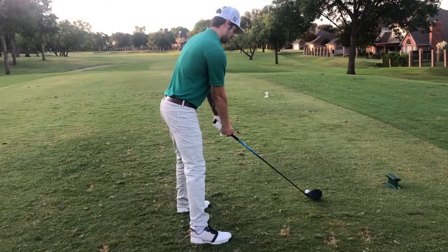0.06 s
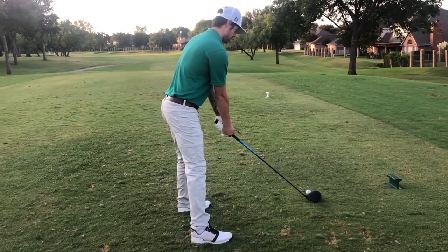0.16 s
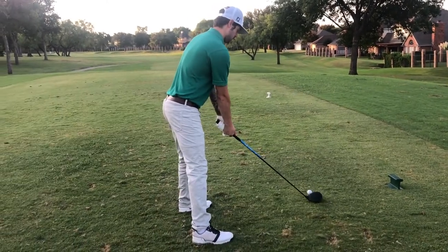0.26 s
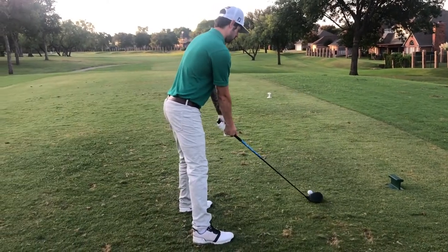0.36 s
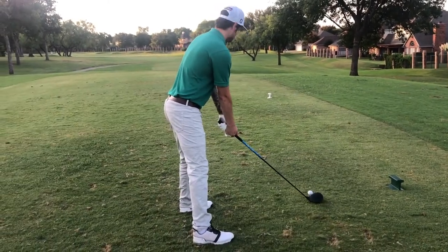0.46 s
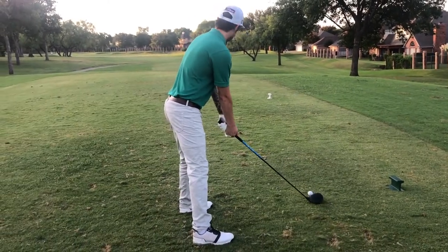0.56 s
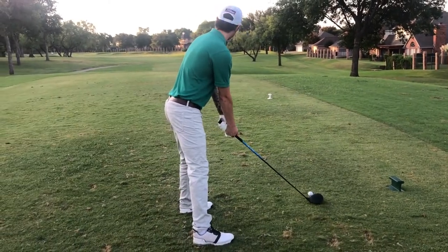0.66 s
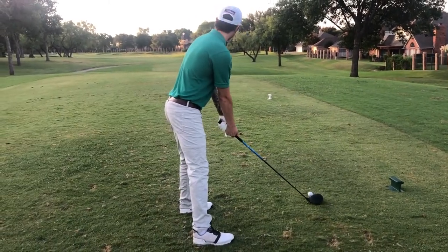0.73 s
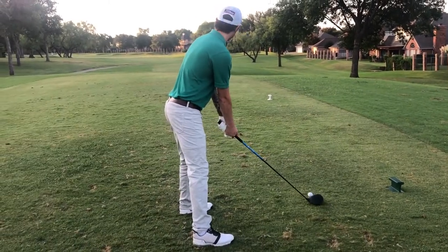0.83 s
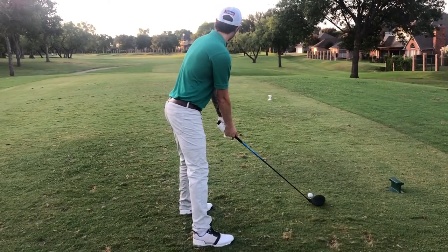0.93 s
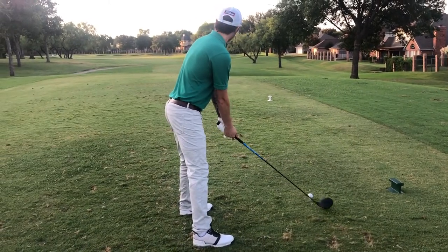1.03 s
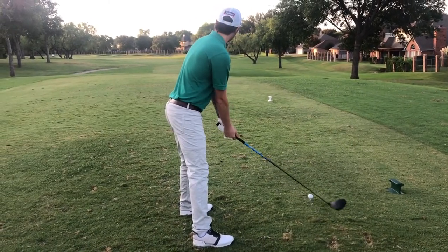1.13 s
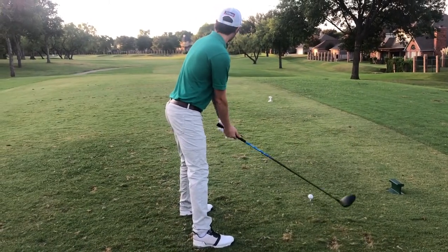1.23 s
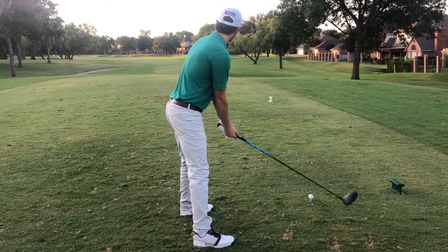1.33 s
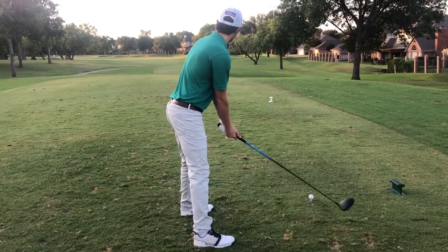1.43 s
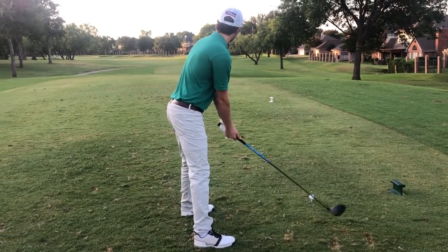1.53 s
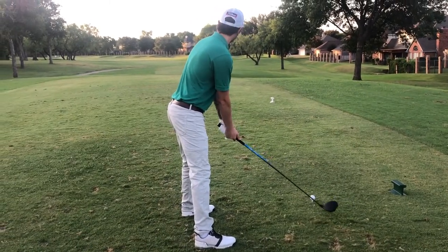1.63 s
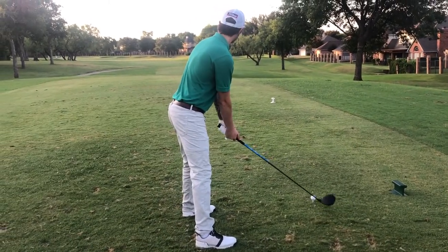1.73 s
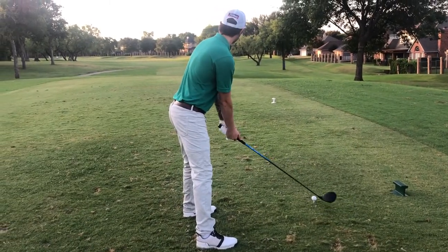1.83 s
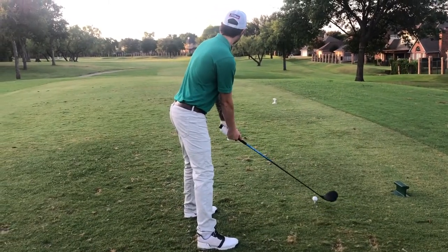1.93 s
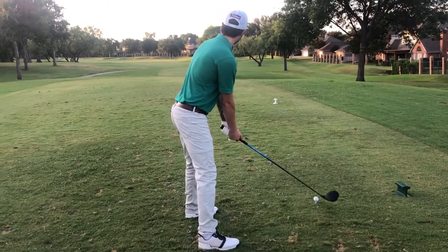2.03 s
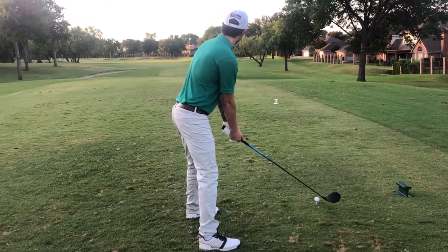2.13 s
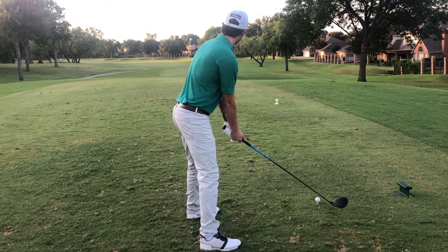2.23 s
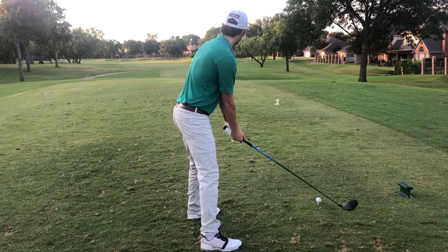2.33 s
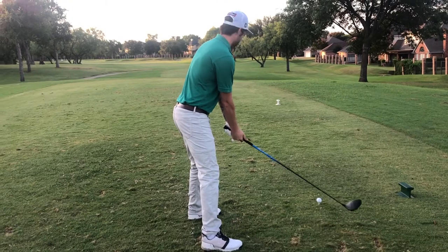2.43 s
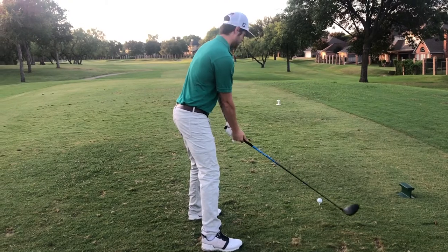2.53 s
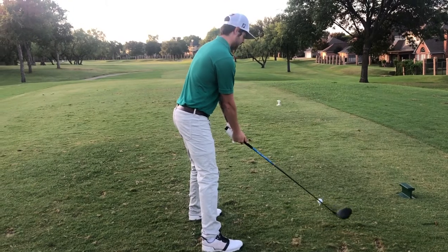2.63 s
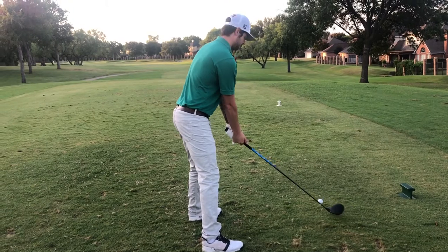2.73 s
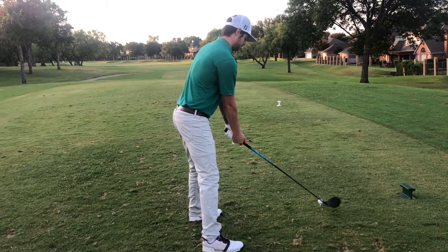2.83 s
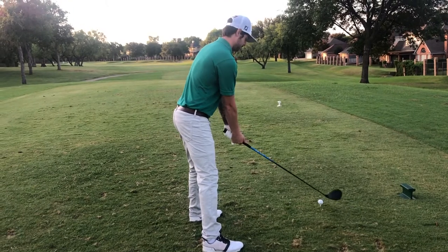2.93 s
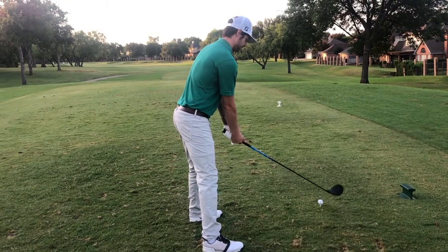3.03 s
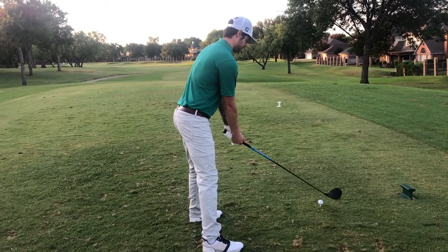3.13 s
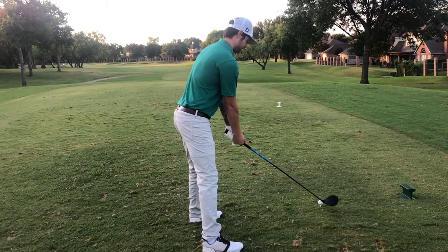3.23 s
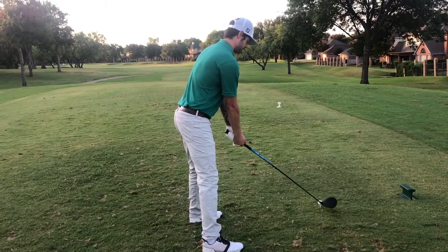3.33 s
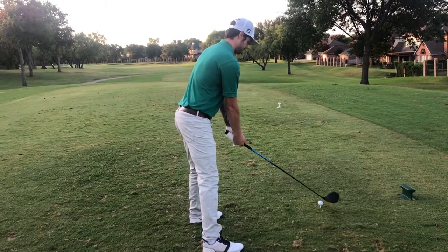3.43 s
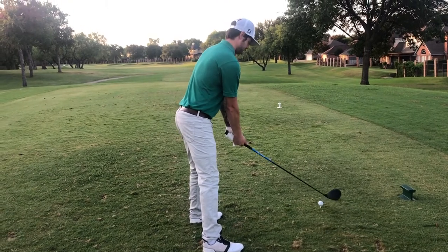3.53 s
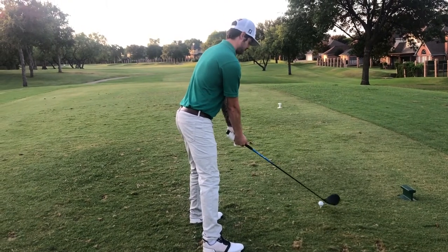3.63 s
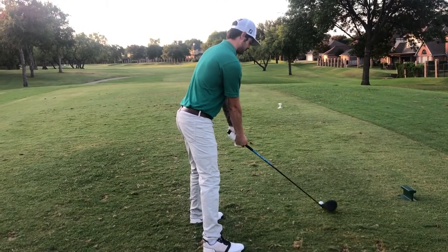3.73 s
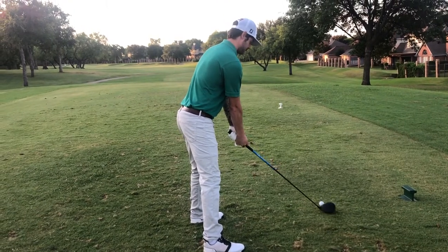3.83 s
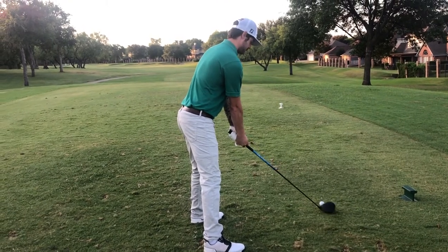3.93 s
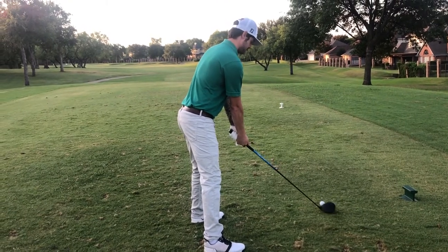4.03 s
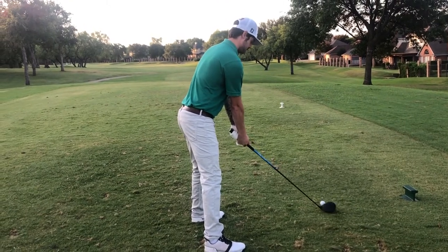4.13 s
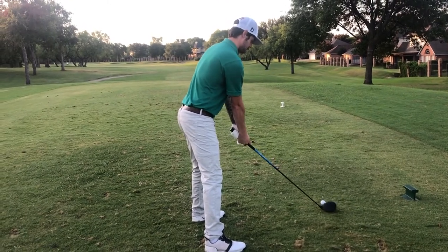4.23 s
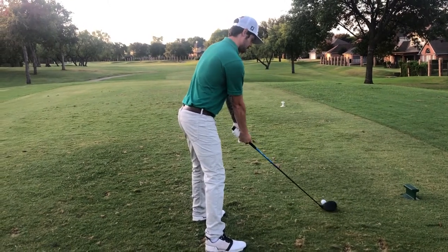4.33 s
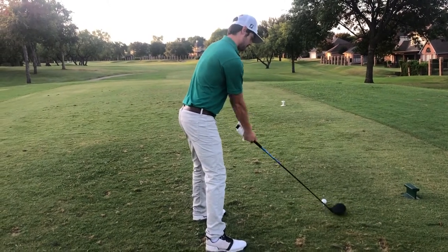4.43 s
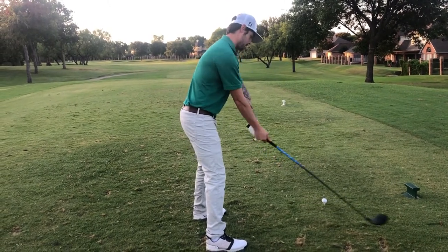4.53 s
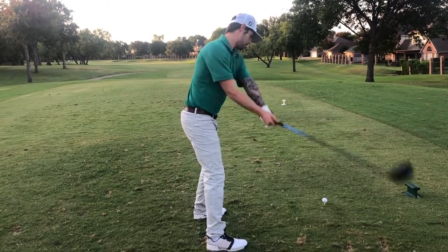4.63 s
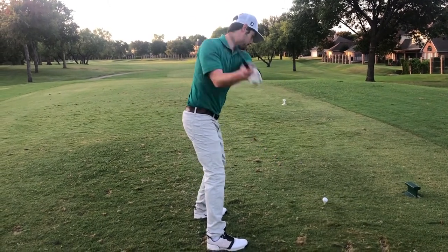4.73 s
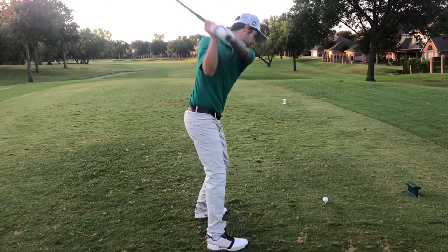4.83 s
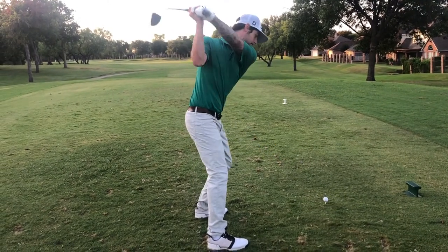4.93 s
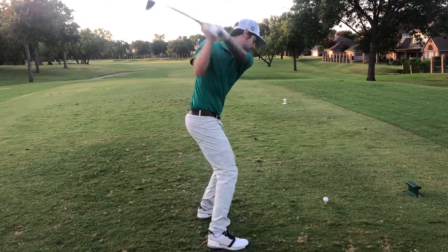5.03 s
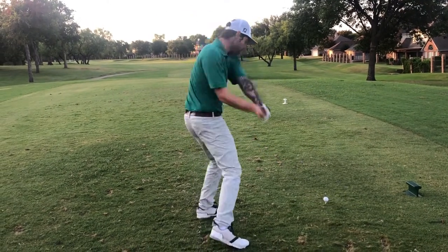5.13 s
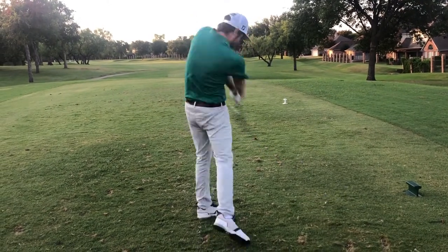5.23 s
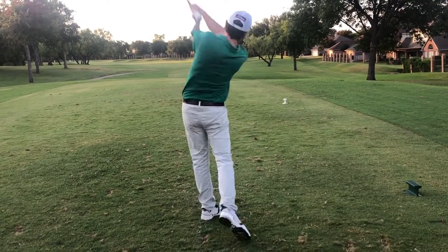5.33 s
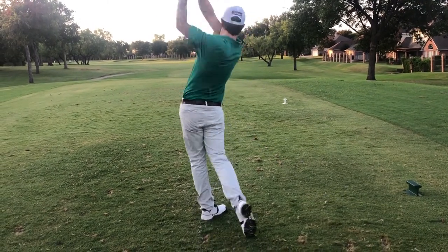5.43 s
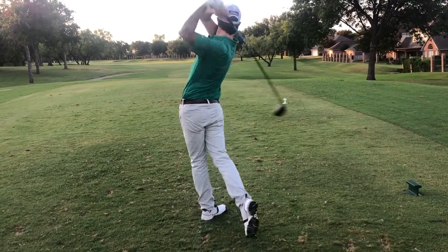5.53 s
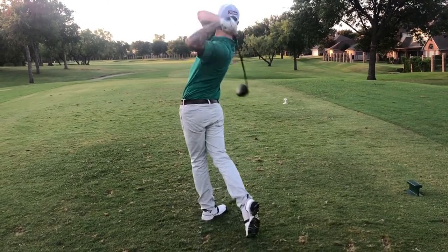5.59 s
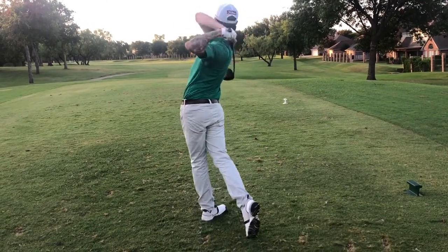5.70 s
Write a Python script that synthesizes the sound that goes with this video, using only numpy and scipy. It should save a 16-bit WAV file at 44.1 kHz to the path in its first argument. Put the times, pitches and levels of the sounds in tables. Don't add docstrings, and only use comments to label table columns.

```python
import sys
import numpy as np
from scipy import signal
from scipy.fft import rfft, irfft, next_fast_len
from scipy.io import wavfile
from scipy.ndimage import uniform_filter1d

SR = 44100
rng = np.random.default_rng(int(sys.argv[2]) if len(sys.argv) > 2 else 0)


def digitize_waveform(pressure):
    field = np.atleast_2d(pressure).T
    bounded = np.clip(field, -1, 1)
    quanta = np.round(bounded * 32767).astype(np.int16)
    wavfile.write(sys.argv[1], SR, quanta)


def elevation(decibels):
    levels = np.asarray(decibels, float)
    return 10 ** (levels / 20)


N = 253999
TIME = np.arange(N) / SR


def rms_one(x):
    return x / np.sqrt(np.mean(x ** 2) + 1e-20)


def in_time(rows):
    seconds, *columns = np.transpose(rows)
    return [np.interp(TIME, seconds, column) for column in columns]


def coloured(x, points):
    size = next_fast_len(N)
    hz, db = np.transpose(points)
    axis_hz = np.maximum(np.arange(size // 2 + 1) * SR / size, 1)
    gain = elevation(np.interp(np.log(axis_hz), np.log(hz), db))
    return irfft(rfft(x, size) * gain, size)[:N]


def filtered(x, order, hz, kind):
    return signal.sosfilt(signal.butter(order, hz, kind, fs=SR, output="sos"), x)


def filtered_in_step(x, hz, kind):
    return signal.sosfiltfilt(signal.butter(2, hz, kind, fs=SR, output="sos"), x)


def drift(rate, size=N):
    knots = np.arange(-1, size / SR * rate + 2) / rate
    wander = np.interp(TIME[:size], knots, rng.standard_normal(len(knots)))
    return rms_one(uniform_filter1d(wander, int(SR / rate / 2)))


def tone(hz):
    return np.sqrt(2) * np.sin(2 * np.pi * np.cumsum(hz + 0 * TIME) / SR)


def struck(modes, since, clock):
    return sum(elevation(db - 60 * since / t60) * np.sin(2 * np.pi * hz * clock) for hz, db, t60 in modes)


def glides(rows, arch, wobble_hz=np.zeros(N)):
    out = np.zeros(N)
    for s, length, first_hz, last_hz, db in rows:
        start = round(s * SR)
        along = np.linspace(0, 1, round(length * SR))
        hz = first_hz + (last_hz - first_hz) * along + wobble_hz[start:start + len(along)]
        swell = np.abs(np.sin(np.pi * along)) ** arch
        out[start:start + len(along)] += elevation(db + 3) * swell * np.sin(2 * np.pi * np.cumsum(hz) / SR)
    return out


# pitch in Hz, level in dB per Hz.
AIR_COLOUR = [(18, -60), (27, -44), (41, -11.5), (74, -2.5), (131, -4), (159, -10.5), (214, -12.5),
              (342, -18), (426, -22.5), (1020, -28.5), (2200, -39), (4630, -45), (9000, -49.5),
              (15500, -55.5)]
# time in seconds, level in dB.
HUM_LEVEL = [(0.0, -47), (0.06, -40.5), (0.4, -49.5), (1.09, -43.5), (1.91, -53), (2.18, -64),
             (2.45, -47.5), (3.05, -54), (3.72, -46), (5.49, -50), (5.65, -45), (5.76, -53)]
# pitch in Hz, wander of the pitch in Hz, level in dB.
MACHINE_DRONES = [(90.6, 8.2, -50.5)]


def air():
    car_s, car_width_s, car_db = 2.52, 0.93, 4
    rise_db = car_db * np.exp(-((TIME - car_s) / car_width_s) ** 2)
    bed = rms_one(coloured(rng.standard_normal(N), AIR_COLOUR))
    low = filtered_in_step(bed, 180, "low")
    traffic = filtered_in_step(bed, [180, 420], "band")
    rest = bed - low - traffic
    out = elevation(-41.5 + 0.47 * drift(2.42)) * low
    out += elevation(-41.0 + rise_db) * traffic
    out += elevation(-42 + 0.48 * drift(3.034)) * rest
    hum_db, = in_time(HUM_LEVEL)
    out += elevation(hum_db - 1.0) * tone(130.6 + 1.52 * drift(3.0))
    for hz, width_hz, db in MACHINE_DRONES:
        out += elevation(db + 1.1 * drift(3.42)) * tone(hz + width_hz * drift(1.5))
    return out


# time in seconds, level in dB, top pitch in Hz.
KATYDID_BUZZ = [
    (0, -79, 9520),
    (1.84, -72.5, 9520),
    (3.08, -69, 9760),
    (5.76, -69, 9740),
]


def katydid():
    db, top_hz = in_time(KATYDID_BUZZ)
    strokes = np.cumsum(63.3 + 0.16 * drift(3.16)) / SR
    arch = np.sin(np.pi * (strokes % 1))
    pitch_hz = top_hz - 1100 * (1 - arch) + 25 * drift(80)
    return elevation(db - 1.5 + 1.6 * drift(18)) * arch ** 0.64 * tone(pitch_hz)


# start in seconds, length in seconds.
CRICKET_TRILLS = [(0.038, 0.3), (0.484, 0.59), (1.217, 0.57), (1.921, .478), (2.565, 0.15), (2.877, 0.55),
                  (3.547, .565), (4.243, .405), (4.797, .414)]


def cricket():
    trill_db, strokes_per_s, fade_db_per_s = -61.5, 88.5, 500
    level, strokes = np.zeros(N), np.zeros(N)
    pace = 3.0 * drift(25) + 2.2 * drift(3.0)
    for s, length in CRICKET_TRILLS:
        over = np.maximum(TIME - s - length, 0)
        on = (TIME >= s) & (over < .05)
        level += on * elevation(trill_db - fade_db_per_s * over)
        strokes += on * np.cumsum((strokes_per_s + pace) * on) / SR
    closing = np.minimum(strokes % 1 / .68, 1)
    stroke_number = np.cumsum(np.diff(strokes // 1, prepend=0) != 0)
    force_db = 4.4 - 2.8 * np.minimum(rng.exponential(1, 600), 4.0)[stroke_number]
    pitch_hz = 5390 - 300 * closing ** 3.0 + 30 * drift(90)
    song = level * elevation(force_db) * np.sin(np.pi * closing) ** 0.44 * tone(pitch_hz)
    neighbours = elevation(-75.5) * drift(150) * tone(5330)
    return song + neighbours


# time in seconds, level in dB, length
# in seconds, lowest and highest Hz.
SOFT_SWELLS = [
    (0.288, -64, 0.048, 500, 5000),
    (1.319, -75, .06, 6300, 6800),
    (3.0, -72, 0.031175, 3790, 4160),
    (4.088, -51, 0.00098, 500, 2500),
    (4.315, -72, 0.017, 6020, 9100),
    (4.516, -64, .03, 2990, 9900),
    (4.803, -70, 0.11296, 2800, 4488),
    (5.1, -54.5, 0.028, 700, 1490),
    (5.626, -47.5, 0.015, 1100, 1510),
]


def rustles():
    out, since = np.zeros(N), TIME[:SR // 4]
    for s, db, length, low_hz, high_hz in SOFT_SWELLS:
        hiss = rms_one(filtered(rng.standard_normal(SR // 4), 2, [low_hz, high_hz], "band"))
        swell = np.exp(-((since - 1 / 8) / length) ** 2)
        out[round(s * SR) - SR // 8:][:SR // 4] += elevation(db) * swell * hiss
    return out


# time in seconds, peak level in dB, pitch in Hz.
FAR_KNOCKS = [
    (1.809, -34, 563),
    (1.854, -36, 627),
    (1.8865, -40, 652),
    (1.925, -39, 594),
]


def knocks():
    out, since = np.zeros(N), TIME[:SR // 4]
    for s, db, hz in FAR_KNOCKS:
        ringing = struck([(hz, -1.5, .04), (1.4434 * hz, -5, .025)], since, since)
        out[round(s * SR):][:SR // 4] += elevation(db + 2.0) * np.minimum(since / .002, 1) * ringing
    return out


# start in seconds, length in seconds, first Hz, last Hz, level in dB.
HIGH_BIRD_NOTES = [(2.085, 0.075, 2846, 3000, -59.5), (2.14, 0.058, 2900, 2780, -55),
                   (2.185, 0.045, 2790, 2950, -55), (2.705, 0.07, 2740, 2840, -64),
                   (2.785, 0.1, 2780, 2840, -55.5), (2.88, .035, 2710, 2670, -67),
                   (3.845, 0.052, 2880, 2750, -56.5), (3.89, 0.055, 2730, 2890, -58),
                   (3.935, 0.058, 2765, 2790, -61), (3.98, 0.042, 2860, 2770, -60),
                   (4.68, 0.095, 2670, 2890, -64), (4.775, 0.0804, 2740, 2936, -58)]
LOW_BIRD_NOTES = [(2.09, 0.11, 2250, 2190, -69), (2.17, 0.11, 2140, 2060, -62),
                  (2.41, 0.06, 2110, 2060, -66), (2.68, .09, 2200, 2200, -69),
                  (2.82, 0.14, 2160, 2060, -62.5), (3.07, 0.043, 2080, 2050, -66),
                  (3.83, .1, 2220, 2150, -72), (3.92, 0.14, 2140, 2105, -61.5),
                  (4.165, 0.069, 2130, 2090, -64), (4.655, 0.13, 2090, 2120, -65.5),
                  (4.785, 0.073, 2210, 2040, -62), (5.03, .07, 2050, 1990, -68)]


def birds():
    out = np.zeros(N)
    for notes, rough_db in [(HIGH_BIRD_NOTES, 2.2), (LOW_BIRD_NOTES, 2.6)]:
        out += elevation(rough_db * drift(110)) * glides(notes, arch=0.5, wobble_hz=22 * drift(70))
    lag = TIME[:SR // 5]
    echoes = elevation(-40 - 60 * lag / 0.5) * rng.standard_normal(len(lag))
    return elevation(0.7) * out + signal.oaconvolve(out, echoes)[:N]


# time in seconds, pitch of the shed swirls in Hz, whoosh level in dB.
DOWNSWING = [
    (5.17, 502, -68),
    (5.21, 473, -46),
    (5.226, 640.6, -35),
    (5.25, 836, -30.5),
    (5.275, 929, -27.5),
    (5.305, 1004, -30.5),
    (5.325, 599.3, -48),
    (5.39, 441, -42.5),
    (5.45, 400, -49),
]


def swing():
    pitch_hz, whoosh_db = in_time(DOWNSWING)
    hiss = coloured(rng.standard_normal(N), [(600, -16.5), (1500, -1.5), (3000, -5.0), (6000, -12.5), (15000, -22.0)])
    hiss_db = -41.5 + 0.71 * (whoosh_db + 28)
    out = elevation(hiss_db - whoosh_db) * rms_one(hiss)
    # share of the pitch, dB, roughness in Hz
    for share, db, spread_hz in [(.28, -7.5, 300.6), (.55, -2.5, 398.7), (1, 0.5, 260.2),
                                 (1.4, -7.5, 450.7), (2.2, -16, 1210)]:
        out = out + elevation(db) * drift(spread_hz) * tone(share * pitch_hz)
    moving = (TIME >= DOWNSWING[0][0]) & (TIME <= DOWNSWING[-1][0])
    return elevation(whoosh_db) * moving * out


STRIKE_S = 5.2961
# start in seconds, length in seconds, first Hz, last Hz, level in dB.
BALL_THUMP = [
    (5.296, 0.0043, 1258, 830, -2),
    (5.2985, 0.0053, 485, 387, -10),
]
# pitch in Hz, level in dB, seconds to die by 60 dB.
FACE_RINGING = [(2610, 12.5, 0.0034), (3350, -7, 0.016), (4105, 4, 0.026), (4000, -14, 0.0087),
                (4533, 8, 0.0069), (5428, -0.5, 0.021), (5076, 0.5, 0.016), (6030, -6, 0.017),
                (6745, -9.5, 0.017), (7685, -8, 0.024), (8040, -9.5, 0.023), (10500, -28, 0.013),
                (12206, -39, 0.013), (13700, -31.5, .012)]
# pitch in Hz, level in dB, seconds to die by 60 dB,
# share of the pitch shift it shows.
HEAD_RINGING = [(2205, 1.5, 0.069, 0.39), (2170, -7, 0.16, 1.04), (2482, -8, .09, 0.25),
                (2497, 4.5, 0.057, 0.36), (3260, -1.5, 0.069, 0.13), (3960, -0.5, 0.081, 0.43),
                (4045, 0, 0.051, 0.2), (4065, -4, 0.091, 1.08), (4800, -19, 0.1, 0.66),
                (5170, -20, 0.097, 1.1), (5470, -17, 0.055, 1.1), (5820, -8, 0.11, 1.1),
                (6040, 0.5, 0.076, 0.92), (6800, -18, 0.11, 1.4), (7320, -12, 0.0699, 1.7),
                (8270, -11, 0.065, 0.85), (8800, -23, .05, 0.99), (9400, -23, 0.03745, .9)]


def strike():
    start = round(STRIKE_S * SR)
    since = TIME[:N - start]
    turning_db = -2401 * np.maximum(0.018 - since, 0)
    leaving_db = -600 * np.maximum(since - 0.078, 0)
    exposure_db = np.maximum(turning_db + leaving_db, -18)
    recede, near = -3, 19
    speed = recede + (near - recede) / (1 + np.exp((0.03 - since) / 0.0118 * 2))
    gained_s = np.cumsum(speed / 343) / SR
    contact = 1 - np.exp(-(since / 0.00096) ** 2)
    noise = filtered(rng.standard_normal(len(since)), 2, [1050, 13300], "band")
    face = elevation(4.0) * struck(FACE_RINGING, since, since)
    crack = contact * (face + elevation(-1.5 - 60 * since / 0.027) * noise)
    late = np.maximum(since - .014, 0)
    head = np.zeros(len(since))
    for hz, db, t60, share in HEAD_RINGING:
        flutter = elevation(4.0 * drift(240, size=len(since)))
        head += flutter * struck([(hz, db, t60)], late, since + share * gained_s)
    dense = elevation(-60 * late / 0.094) * (filtered(noise, 2, [1900, 8200], "band") + 0.37 * noise)
    out = glides(BALL_THUMP, arch=1.44)
    out[start:] += crack + elevation(exposure_db - 12.5) * (head + dense)
    return out


# delay in seconds, depth in seconds, level in dB,
# change above 8 kHz in dB.
TREES_AND_HOUSES = [
    (.043, .009, -45, -10),
    (0.087, 0.019, -44.5, -1.5),
    (.131, 0.011, -49, -2),
    (.19, .022, -49, -3.5),
    (.255, 0.036, -54, -8),
]
# pitch in Hz, level in dB.
SCATTER_COLOUR = [(200, -0.5), (700, -16.5), (1400, -15), (2350, -5.5), (3300, -13.5), (4050, -12),
                  (4500, -6), (5400, -11.5), (6000, -4), (6800, -4.5), (8500, -11.5), (12000, -16.5),
                  (16000, -27)]


def scattered(x):
    lag = TIME[:SR // 2]
    leaves = rng.standard_normal(len(lag))
    high = filtered(leaves, 4, 8000, "high")
    low = filtered(leaves, 4, 8000, "low")
    late = np.maximum(lag - 0.137, 0)
    answer = (late > 0) * elevation(-53.5 - 28 * late) * (low + elevation(-70 * late) * high)
    for delay, depth, db, loss_db in TREES_AND_HOUSES:
        answer += elevation(db) * np.exp(-((lag - delay) / depth) ** 2) * (low + elevation(loss_db) * high)
    return coloured(signal.fftconvolve(x, answer)[:N], SCATTER_COLOUR)


def scene():
    background = air() + katydid() + cricket() + rustles() + knocks() + birds()
    whoosh = swing()
    hit = strike()
    snap = elevation(21.5) * (np.arange(N) == round(STRIKE_S * SR))
    return (background + whoosh + hit + scattered(elevation(-7) * hit + snap))[None]


def low_pass(x):
    return signal.sosfilt(signal.butter(12, 15640, fs=SR, output="sos"), x)


def record(dry):
    clipped = dry / (1 + np.abs(dry) ** 7.8) ** (1 / 9.9)
    cut = filtered(clipped, 10, 16300, "low")
    return low_pass(np.clip(cut, -1, 1))


dry = scene()
out = record(dry)
digitize_waveform(out)
```